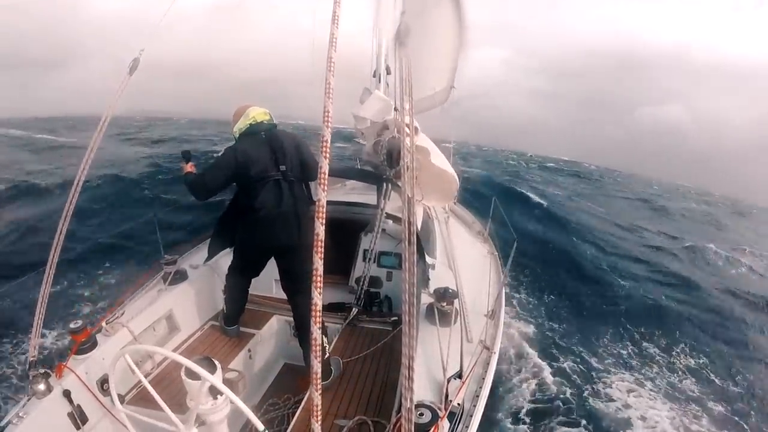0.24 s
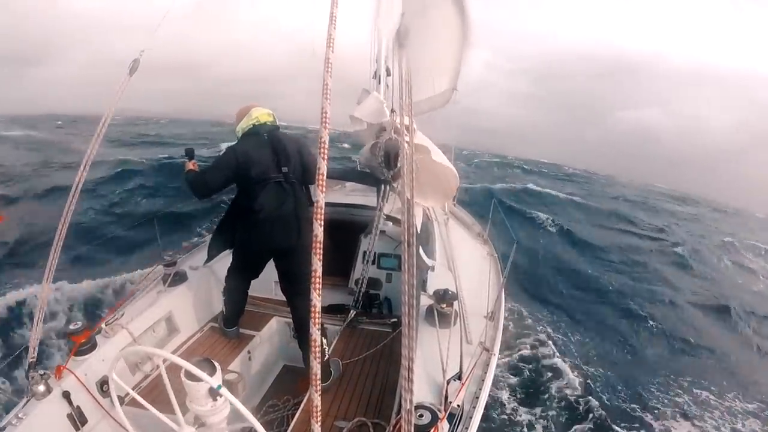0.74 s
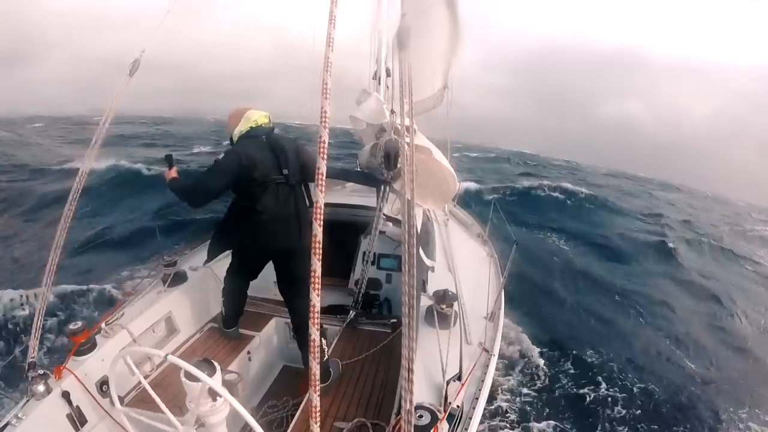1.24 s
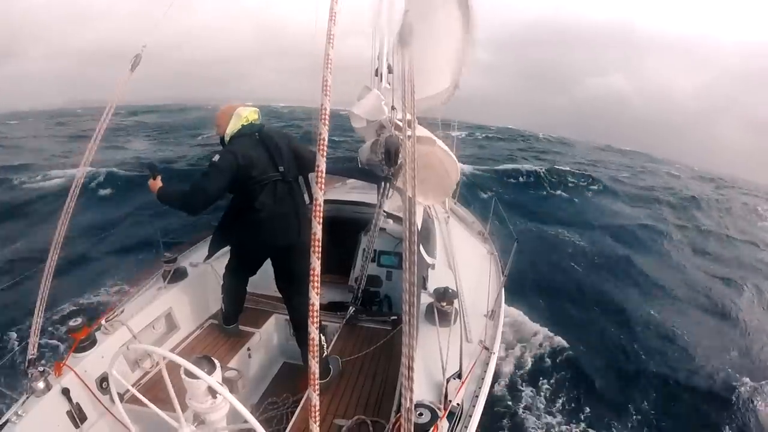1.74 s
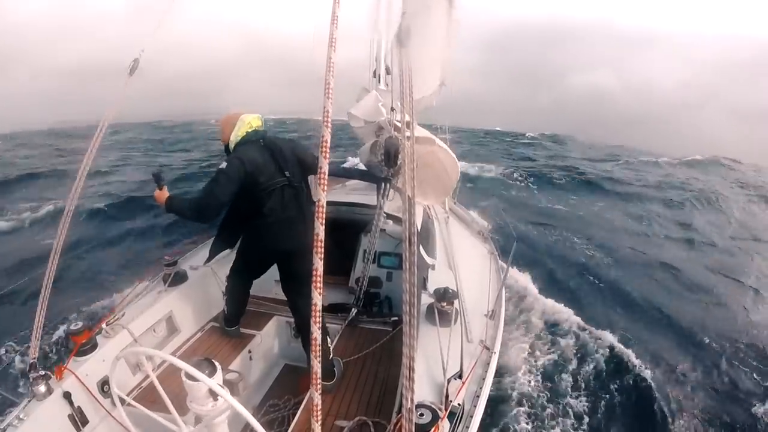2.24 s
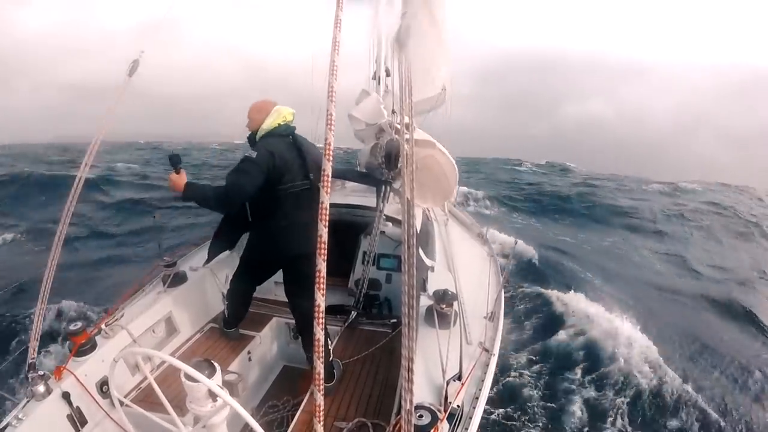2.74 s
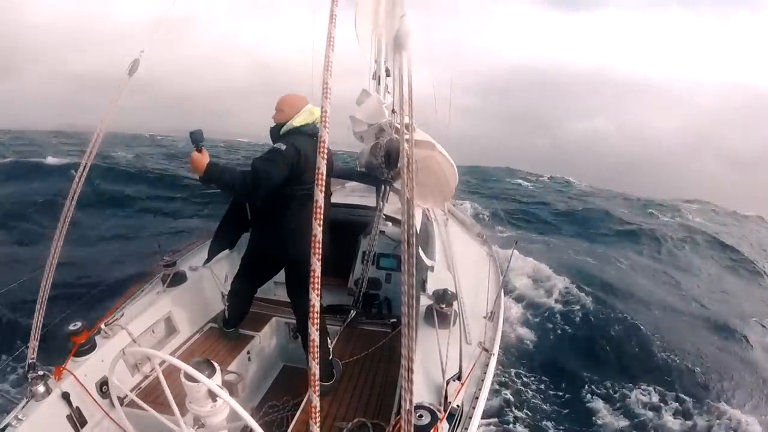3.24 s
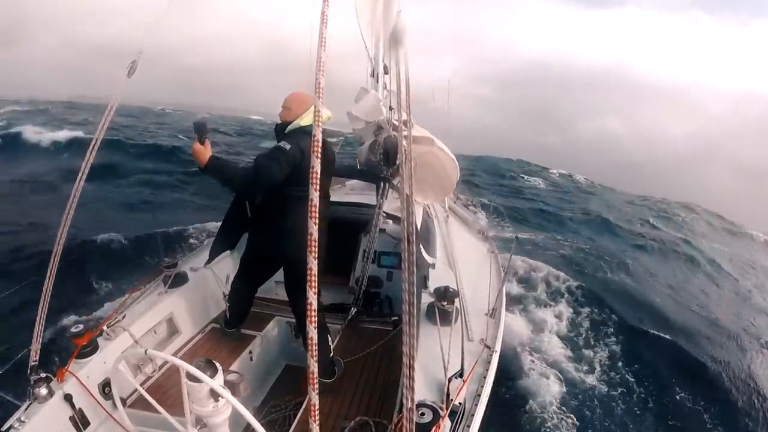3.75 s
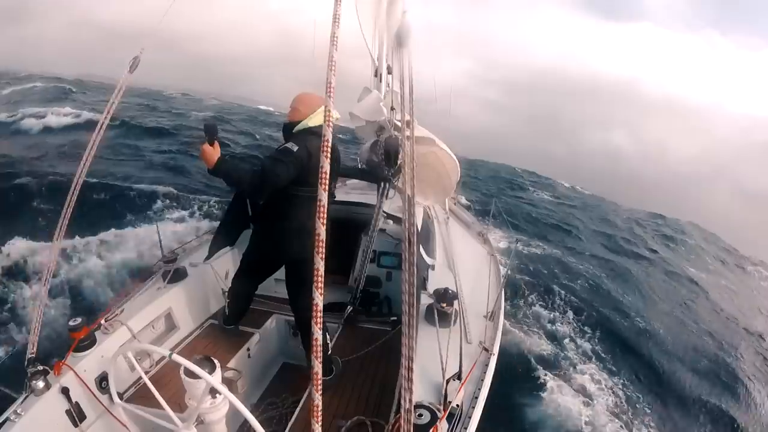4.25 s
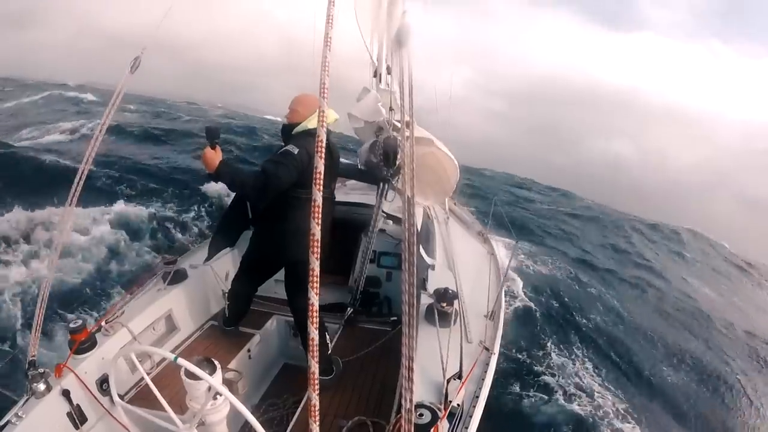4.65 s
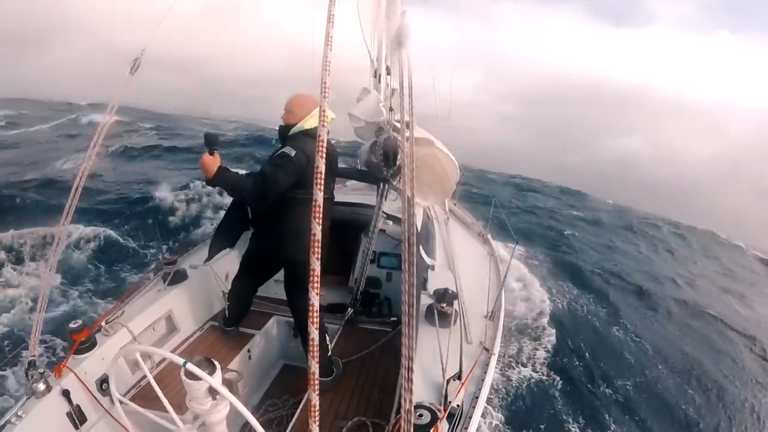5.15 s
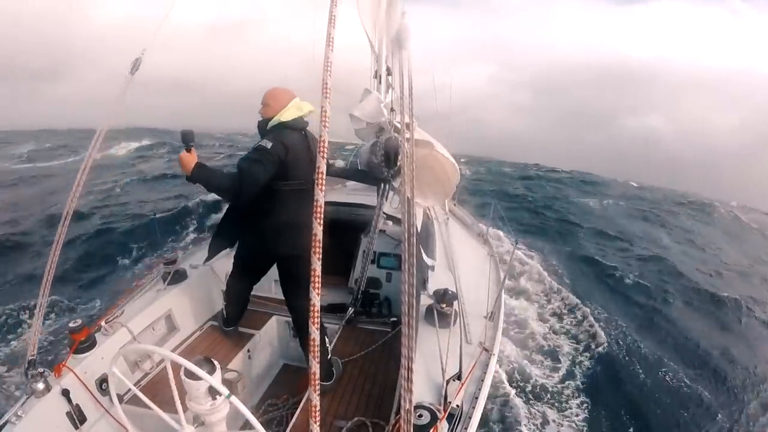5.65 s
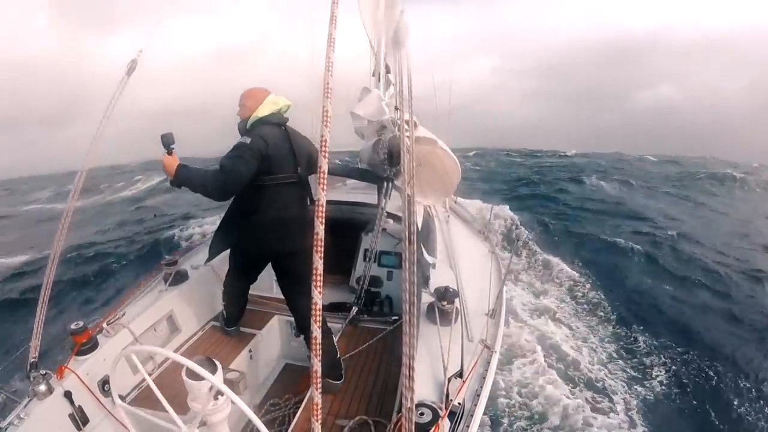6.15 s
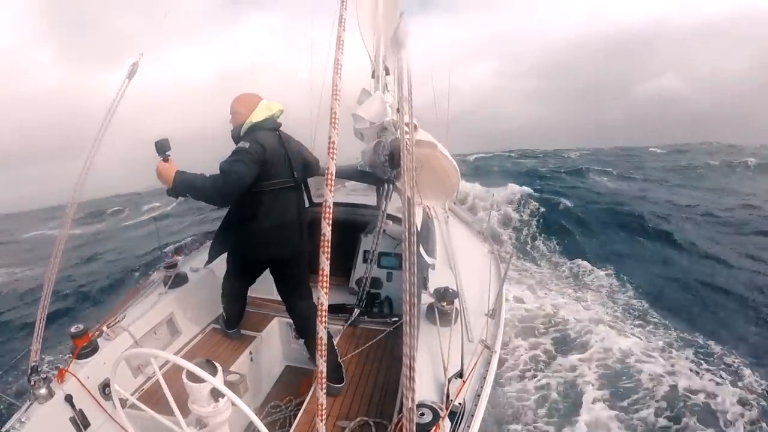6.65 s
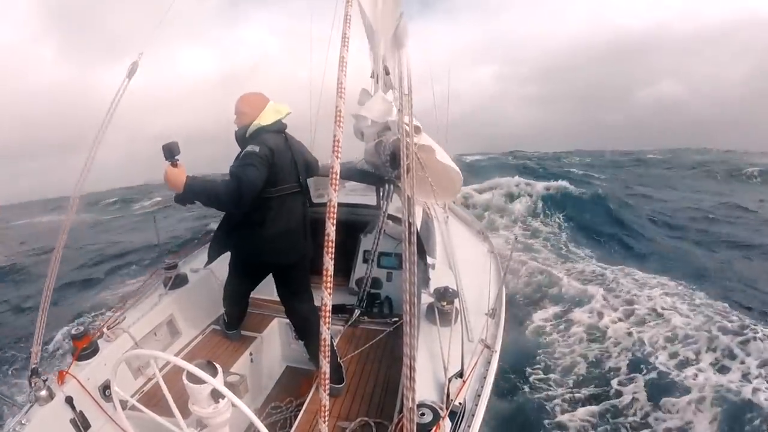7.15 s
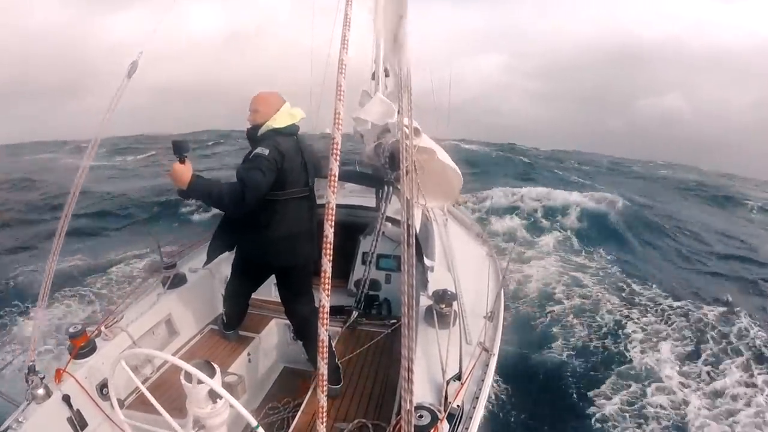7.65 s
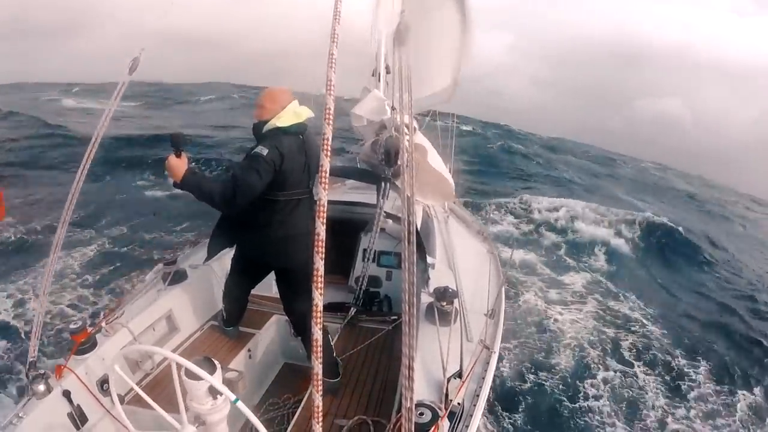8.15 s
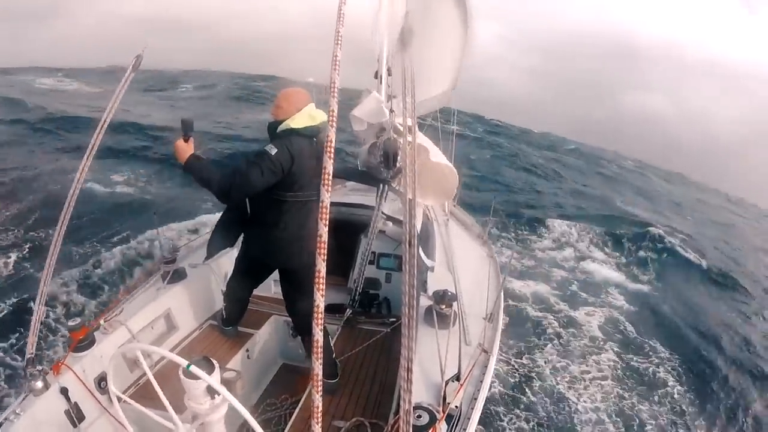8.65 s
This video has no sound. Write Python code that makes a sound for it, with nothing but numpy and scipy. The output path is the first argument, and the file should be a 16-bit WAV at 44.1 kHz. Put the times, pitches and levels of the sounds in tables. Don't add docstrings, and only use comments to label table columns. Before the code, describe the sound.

Overwhelming low wind buffeting rolls over an enclosed deck camera microphone in irregular thuds, with short lulls. Breaking crests swell and slacken beneath, muffled roar below and wet hiss above, with tiny bubbles in the wash. Shrouds hum softly in gusts. A spray swish leads into a booming slap at about 3.3 seconds; scattered pops and drops follow, then a sharp cluster of cracks and rattling hits around eight seconds. Outdoors, rough sea, no voice.

```python
import sys
import numpy as np
from scipy import signal
from scipy.fft import rfft, irfft, next_fast_len
from scipy.io import wavfile
from scipy.ndimage import uniform_filter1d, map_coordinates

SR = 44100
rng = np.random.default_rng(int(sys.argv[2]) if len(sys.argv) > 2 else 0)


def inscribe(sig):
    pcm = np.round(np.clip(np.atleast_2d(sig).T, -1, 1) * 32767)
    wavfile.write(sys.argv[1], SR, pcm.astype(np.int16))


def how_loud(loudness_db):
    steps = np.asarray(loudness_db, float) / 20
    return 10 ** steps


N = 393061

# [f/Hz, level/dB]
HEAVE_COLOUR = [(4, -31), (10, -3.5), (27, 0), (60, -4), (80, -9), (110, -19), (200, -61), (400, -120)]
FLUTTER_COLOUR = [(40, -34.5), (75, -2), (125, -3.5), (180, -11.5), (230, -26.5), (330, -51.5), (600, -120)]
RATTLE_COLOUR = [(120, -42), (200, 0), (280, -6), (330, -15.5), (500, -28.5), (900, -61), (1500, -120)]
# [t/s, strength level/dB, middle-eddy level/dB, small-eddy level/dB]
WIND = [(0, -11.5, -1, -2.5), (.6, -10.5, 1.5, -1), (1.3, -9.5, -1.5, -2.5), (2.1, -12.5, 1.5, 0.5),
        (2.8, -11, 2.5, 1.5), (3.5, -11, -1, 0), (4.2, -10.5, -1, 0.5), (4.9, -11.5, 0, 1),
        (5.6, -9.5, -3.5, -1.5), (6.3, -10.5, -2, -1.5), (7, -12, 1, 3), (7.7, -12, 3.5, 1),
        (8.3, -10.5, -0.5, 2), (8.91, -10, 0, -3.5)]
# [t/s, length/s, slow push level/dB, fast
# flutter level/dB]
EDDIES = [(0.22, 0.09, 4.5, 9), (0.63, 0.29, 0.5, 2), (0.85, 0.028, 6, 6), (1.16, 0.028, 10, -3),
          (1.48, 0.016, 4.5, 0.5), (2.19, 0.039, 1, 11.5), (2.33, 0.1, -2.5, 7), (2.51, 0.033, 5.5, -8),
          (3.08, 0.043, 6, 2), (3.31, 0.13, 4.5, 2.5), (3.4, 0.023, 5, 1), (4.19, 0.095, 6, -3),
          (4.72, 0.079, 4.5, 3.5), (5.31, 0.034, 5, 7), (5.8, 0.057, 3, 7.5), (6.1, 0.088, 3, 5),
          (6.26, 0.037, 6, 5), (6.47, 0.18, -2.5, 5.5), (6.74, 0.077, 6.5, 8.5), (7.12, 0.028, -6, 16),
          (7.18, 0.084, 4.5, 4.5), (7.27, 0.042, 3, 6.5), (7.59, 0.025, 10, 5.5), (7.67, 0.031, 12.5, -0.5),
          (7.85, 0.1, 9, 1.5), (8.21, 0.029, 9, 4), (8.41, 0.082, 1, 5), (8.59, 0.042, 9, 5),
          (0.024, 0.064, 0, 2), (0.69, 0.099, 1, 4), (.88, 0.054, 0.5, -4), (0.963, 0.036, 0, 2),
           (1.06, 0.038, 5.5, 4.5), (1.183, .07, 0, 0.5), (1.546, .05, -0.5, 1.5), (1.673, .07, 1, -8),
           (1.768, 0.078, 5.5, -5), (1.915, 0.063, 3, -1), (2.155, .05, 2, -6), (2.306, .05, 6, -1),
           (2.444, 0.038, 2.5, -2), (2.553, 0.036, -2, -0.5), (2.746, 0.051, 0, 0), (2.85, 0.039, -5, -0.5),
           (2.954, 0.04, -8, -6), (3.27, .05, 0, 4.5), (3.495, 0.059, 2.5, -5), (3.603, .06, 1, 2.5),
           (3.798, 0.062, 0.5, 5.5), (4.06, .08, -1, -2), (4.204, .05, -2, 1), (4.267, .05, -1, 3),
           (4.55, .05, -5, -5), (4.62, 0.079, 0, 1.5), (4.82, .07, -2.5, -1), (4.924, .07, 2.5, 3),
           (5.05, .06, -2, 3.5), (5.206, .05, 3, -3), (5.61, .05, 4, 0), (5.67, 0.072, -2.5, -6.5),
           (5.975, 0.048, 0.5, 3), (6.19, 0.069, 1, -4), (6.323, 0.055, -1, -0.5), (6.413, 0.036, 5.5, 0),
           (6.51, .05, -2, 2), (6.874, 0.049, 5.5, 0.5), (7.098, 0.044, -2, -3), (7.296, 0.041, 2.5, 4.5),
           (7.42, .08, -3.5, 0), (7.55, .08, -0.5, -2), (7.866, 0.071, -0.5, -4), (8.116, .07, 3, -2.5),
           (8.2, 0.037, -4, 3), (8.367, .07, -1, -5), (8.55, 0.082, -2, 2.5), (8.8, 0.059, -3.5, 1.5)]
# [t/s, length/s, depth/dB]
LULLS = [(.05, 0.11, 2.5), (.48, 0.055, 7), (1.39, 0.045, 8), (1.62, 0.041, 8), (1.86, 0.023, 7),
         (2.1, 0.076, 4.5), (2.25, 0.048, 9), (2.69, 0.12, 5), (2.91, 0.1, 1.5), (3.62, 0.21, 6),
         (3.87, .06, 7), (4.84, 0.062, 3.5), (5.04, 0.074, 6), (5.24, 0.089, 5.5), (5.53, 0.084, 9.5),
         (6.2, .04, 5.5), (6.37, 0.037, 9), (6.59, 0.037, 5.5), (7.45, 0.25, 2.5), (7.64, 0.024, 5.5),
         (7.74, 0.09, 10), (8.01, 0.044, 5.5), (8.54, .04, 6.5), (.92, 0.048, 3.5), (1.22, 0.042, 4.5),
         (4.07, .06, -0.5), (7.35, 0.065, 1), (.32, .04, 5), (7.5, .025, 8), (1.72, .04, 3), (3.7, .04, 4),
         (2.47, .03, 4)]
# [t/s, level/dB]
JOLTS = [(0.25, 8.5), (1.44, 2), (2.11, 9), (2.18, 8.5), (3.19, 8.5), (3.33, 13.5), (4.7, 1), (6.08, 8.5),
         (6.44, 3), (6.76, 7.5), (7.26, 2.5), (7.59, 10.5), (8.03, 13.5), (8.58, 2.5), (.95, 5),
         (1.28, 1.5), (1.55, 2), (1.66, -1), (1.8, 3), (2.75, -4), (3.45, 2), (4.87, -2), (5.2, -1.5),
         (5.4, 1), (5.65, 3), (5.84, -1), (6.9, -1), (7.14, -5), (7.36, -2), (8.15, -1)]
JOLT_S = 0.059
HEAVE_DB, FLUTTER_DB, RATTLE_DB = -2.5, -15, -29.5
RATTLE_FOLLOWS = 0.26
SHARED_CHOP_DB, HEAVE_CHOP_DB, CHOP_DB = 1.0, 1.5, 1.5

# [f/Hz, level/dB]
ROAR_COLOUR = [(210, -29), (350, -1), (443, -6.5), (526, -6), (805, -11), (886, -9.5), (1600, -13.5),
               (2080, -38.5), (3520, -120)]
WASH_COLOUR = [(880, -40), (1500, -18), (1590, -15), (1790, -1), (2390, 0.5), (2980, -1.5), (3350, -7),
               (3810, -4.5), (4240, -13.5), (4500, -14.5), (5850, -40), (9900, -120)]
SPRAY_COLOUR = [(2470, -34), (4200, -3.5), (4730, 0), (5160, -6.5), (5830, -4.5), (6510, -11), (7020, -6),
                (7900, -15.5), (9430, -14.5), (11500, -22.5), (15000, -52), (22000, -120)]
MIST_COLOUR = [(6000, -39.5), (8500, -4), (11500, -6.5), (15300, -6.5), (17000, -58)]
# [t/s, wash level/dB]
FLOW = [(0.0, -49.5), (0.81, -48), (1.62, -44.5), (2.43, -46), (3.24, -46), (4.05, -49), (4.86, -49.5),
        (5.67, -52.5), (6.48, -48.0), (7.29, -47.5), (8.1, -48), (8.91, -48.5)]
# [t/s, length/s, swell level/dB, extra spray level/dB]
CRESTS = [(.235, 0.067, 7, 1), (.8, 0.22, 2.5, 1.5), (1.35, 0.13, 2, -0.5), (1.93, .25, 2.5, -2),
          (2.13, 0.087, 4.5, -1.5), (2.2, 0.047, 6.5, 2), (2.41, 0.027, 1, -3), (2.46, 0.021, 5, -3),
          (2.58, 0.077, 2, 2.5), (3.07, 0.061, 3.5, -1.5), (3.14, 0.21, 1, 5), (3.23, 0.065, 1.5, -0.5),
          (3.74, 0.11, 0, 2.5), (4.11, 0.034, 4.5, -4), (4.26, 0.042, 3.5, -2.5), (4.37, 0.026, 1.5, -2),
          (4.51, .07, 2.5, 1.5), (4.52, 0.34, 5, -2), (4.65, 0.036, 2.5, -1), (5.79, 0.063, 2.5, -3.5),
          (6.09, 0.05, 3.5, 1.5), (6.43, 0.091, 3, -1), (6.75, .14, 3, 1), (7.16, .12, 3, 0.5),
          (8.03, 0.035, 3, 4), (8.44, 0.2, 3.5, -1.5), (8.81, 0.046, 4, -2), (.58, .15, 1, -1)]
# [t/s, length/s, depth/dB]
TROUGHS = [(.39, .12, 4), (1.16, 0.11, 1.5), (1.72, 0.39, 2.5), (2.36, .07, 2.5), (2.75, 0.097, 2.5),
           (3.61, 0.13, 0.5), (3.96, 0.19, 3), (5.12, 0.24, 1), (5.68, 0.079, 1.5), (7.4, .12, 2.5),
           (7.73, 0.28, 3.5), (8.7, .2, -0.5)]
# [t/s, length/s, swell level/dB]
BREAKERS = [
    (.95, .4, 1.5),
    (3.17, 0.25, 6),
    (5.4, 0.37, 1),
    (6.9, .4, 1),
    (7.5, 0.74, 1),
    (8.08, 0.23, 5),
]
# [t/s, f/Hz]
GURGLE = [(0.0, 2460), (0.99, 2430), (1.68, 2540), (1.78, 2323), (3.22, 2602), (3.44, 2422), (6.0, 2350),
          (6.22, 2622), (7.71, 2260), (8.06, 2576), (8.18, 2216), (8.23, 2500), (8.38, 2296), (8.9, 2487)]
ROAR_DB, WASH_DB, SPRAY_DB, BUBBLE_DB = -4, -3, -11, -9.5
ROAR_FOLLOWS, SPRAY_FOLLOWS = 0.35, 0.88
MIST_FOLLOWS = 0.5
RISE_SHARE = 0.96
SPLATS_PER_S, SPLAT_S, SPLAT_DB = 60, 0.011, 0.95
SPLIT_HZ, UPPER_FOLLOWS = 2500, 0.96
BUBBLES_PER_S, BUBBLE_S = 45, 0.022
BUBBLE_RISE, BUBBLE_SPREAD = 0.2, 0.1

# [t/s, length/s, swell level/dB]
LOW_SINGS = [
    (2.36, 0.076, 14.5),
    (3.5, 0.68, 9.5),
    (5.3, 0.3, 10.5),
    (6.6, 0.42, 6.5),
    (7.02, 0.14, 17),
    (7.4, 0.36, 6),
    (7.72, .1, 12.5),
    (8.1, 0.33, 14.5),
]
HIGH_SINGS = [
    (1.41, .25, 6),
    (2.1, .35, 4.9),
    (3.14, .15, 17),
    (3.65, .3, 10.4),
    (5.3, .3, 4),
    (6.6, .2, 6),
    (7.02, .15, 6),
    (8.03, 0.14, 12),
]
LOW_REST_DB, HIGH_REST_DB = -66.5, -66
# [t/s, f/Hz, level/dB]
CREAK = [
    (5.21, 1750, -72),
    (5.223, 1750, -52),
    (5.288, 1780, -55),
    (5.3, 2300, -58),
    (5.315, 3000, -55),
    (5.33, 3200, -72),
]

# [t/s, rms level/dB, rise/s, fall by 60 dB/s, brightness level/dB]
SLAPS = [(3.313, -35.5, 0.027, 0.12, -11), (8.007, -35.5, 0.0033, 0.048, -2.5),
         (8.014, -33.5, 0.0073, 0.098, -4), (8.03, -40, .003, 0.067, 4), (8.7, -46, .006, .08, 0),
         (8.078, -46, .008, 0.08, 4), (8.1715, -50, .0008, .03, 14), (8.001, -39, .004, .08, -4),
         (8.042, -38, .006, .1, -4), (2.5, -56, .03, .12, -1), (0.23, -54, 0.033, 0.15, 5.5)]
# [f/Hz, level/dB]
SLAP_BODY = [(210, -27), (350, -7), (421, 2), (517, -12), (878, -3), (1310, -9.5), (1470, -12), (1700, -33),
             (2210, -55.5), (3740, -120)]
SLAP_CRACK = [(1000, -43), (1700, -10), (2790, -9), (3080, -2), (4370, -11), (4720, -21), (5940, -11.5),
              (6640, -21.5), (10700, -30), (13000, -36)]
# [t/s, centre f/Hz, level/dB]
SWISH = [
    (3.05, 5400, -72),
    (3.075, 5800, -54),
    (3.14, 6200, -53),
    (3.165, 7600, -57),
    (3.185, 9800, -63),
    (3.205, 11400, -80),
]
# [t/s, peak level/dB, width/ms]
POPS = [
    (3.313, -29, .3),
    (3.331, -19.5, 0.27),
    (6.1228, -24, 0.15),
    (7.275, -27, 0.22),
    (0.277, -32, .3),
    (6.251, -38, .3),
    (6.966, -45, .3),
]
# [t/s, peak level/dB, case ring level/dB]
DROPS = [(2.1024, -47, 7), (2.464, -51, 1), (3.0779, -46, 4), (4.721, -44, 1), (4.7544, -56, 5),
         (4.9591, -50.5, 4), (5.152, -46, -5), (5.158, -40.5, -12), (6.001, -49, -12), (6.9166, -40, -8),
         (7.1157, -38, -6), (8.012, -48, 5), (8.1712, -47, 2)]
# [f/Hz, level/dB]
DROP_COLOUR = [(1500, -37), (4300, -1), (7000, -1), (11500, -2), (15500, -10.5), (20000, -43)]
# [t/s, f/Hz, peak level/dB, fall by 60 dB/s]
BOOMS = [
    (3.309, 455, -26.5, 0.16),
    (3.312, 296, -28, 0.16),
    (8.015, 348, -37, 0.18),
]
# [t/s, f/Hz, peak level/dB, fall by 60 dB/s]
RINGS = [(3.307, 1150, -39, .05), (8.001, 1110, -38, .05), (8.0105, 5780, -46, .015),
         (8.012, 851, -32, .08), (8.008, 1450, -38, .06), (8.018, 600, -36, .07), (8.022, 3140, -42, .05),
         (8.027, 3900, -45, .02), (8.04, 6800, -50, .012), (8.05, 5780, -50, .012), (8.052, 3140, -46, .03),
         (8.072, 1300, -42, .03), (8.073, 900, -41, .04), (8.08, 3600, -43, .015), (8.084, 4400, -48, .01),
         (8.1708, 3450, -37, .018), (8.1712, 2700, -41, .012), (8.1735, 1900, -36, .025),
         (8.172, 950, -42, .02)]
RING_ROUGH_DB = 2.5

# [t/s, length/s, highest f kept/Hz]
SHORTFALLS = [(.17, .05, 11200), (.43, .025, 11000), (.51, .04, 11300), (.74, .05, 12800),
              (1.18, .03, 11100), (1.36, .05, 13600), (1.47, .03, 11000), (1.6, .05, 13400),
              (1.7, .025, 13000), (1.83, .055, 12000), (1.94, .085, 12100), (2.18, .075, 11500),
              (2.43, .07, 11100), (2.56, .04, 11100), (2.64, .04, 11900), (3.2, .03, 11100),
              (3.42, .05, 11100), (3.52, .04, 13500), (3.64, .04, 13200), (4.23, .03, 11400),
              (4.42, .07, 12500), (4.76, .13, 11300), (4.93, .075, 12800), (5.27, .05, 11300),
              (5.49, .04, 14400), (5.65, .04, 12400), (5.77, .025, 11200), (5.94, .045, 11200),
              (6.17, .055, 11300), (6.36, .03, 12900), (6.46, .045, 12600), (6.55, .055, 11300),
              (6.73, .05, 12800), (6.83, .035, 11200), (7.02, .03, 11200), (7.08, .025, 12900),
              (7.14, .07, 12000), (7.3, .04, 11300), (7.41, .05, 12000), (7.73, .05, 12600),
              (7.93, .1, 12800), (8.13, .035, 11300), (8.21, .035, 11300), (8.75, .13, 11900)]
TOP = 0.97


def unit(x):
    return x / np.sqrt(np.mean(x ** 2) + 1e-20)


def curves(rows):
    s, *columns = np.transpose(rows)
    return [np.interp(np.arange(N) / SR, s, column) for column in columns]


def swells(rows, rise=1):
    s, length, *dbs = np.transpose(rows)
    t = np.arange(0, N + 128, 128) / SR
    late = t[:, None] - s
    flank = length * np.where(late < 0, rise, 2 - rise)
    bells = np.exp(-4 * np.log(2) * (late / flank) ** 2)
    return [np.interp(np.arange(N) / SR, t, bells @ db) for db in dbs]


def wobble(rate):
    knots = rng.standard_normal(int(N * rate / SR) + 4)
    return map_coordinates(knots, [np.arange(N) * rate / SR])


def coloured(x, spectrum):
    m = next_fast_len(len(x) + 8192)
    hz, db = np.transpose(spectrum)
    log_hz = np.log(np.fft.rfftfreq(m, 1 / SR) + 1)
    gain = how_loud(np.interp(log_hz, np.log(hz + 1), db))
    return unit(irfft(rfft(x, m) * gain, m)[:len(x)])


def steadied(x, span, share):
    power = np.abs(signal.hilbert(x, next_fast_len(N))[:N]) ** 2
    width = int(span * SR)
    swell = np.abs(uniform_filter1d(uniform_filter1d(power, width), width)) + 1e-3
    return unit(x * swell ** (-np.clip(share, 0, 1) / 2))


def buffet():
    wind_db, churn_db, small_db = curves(WIND)
    push_db, fast_db = swells(EDDIES)
    lull_db, = swells(LULLS)
    jolt_db, = swells([(s, JOLT_S, db) for s, db in JOLTS])
    wind_db = wind_db + SHARED_CHOP_DB * wobble(14)

    heave_db = wind_db + HEAVE_DB + push_db - lull_db + HEAVE_CHOP_DB * wobble(16)
    flutter_db = wind_db + FLUTTER_DB + churn_db + fast_db - lull_db + CHOP_DB * wobble(18)
    rattle_db = wind_db + RATTLE_DB + RATTLE_FOLLOWS * (fast_db - lull_db)
    rattle_db = rattle_db + small_db + jolt_db + CHOP_DB * wobble(18)

    lumps = wobble(30)
    heave = coloured(rng.standard_normal(N), HEAVE_COLOUR)
    flutter = coloured(how_loud(2.85 * lumps) * rng.standard_normal(N), FLUTTER_COLOUR)
    rattle = coloured(how_loud(2.1 * lumps) * rng.standard_normal(N), RATTLE_COLOUR)
    heave = steadied(heave, 0.066, 0.68)
    flutter = steadied(flutter, 0.047, 0.69)
    rattle = steadied(rattle, 0.032, 0.57)
    return how_loud(heave_db) * heave + how_loud(flutter_db) * flutter + how_loud(rattle_db) * rattle


def patchy(spectrum, patchy_db, grains_per_s, grain_db):
    z = signal.stft(rng.standard_normal(N), nperseg=512)[2]
    field = uniform_filter1d(rng.standard_normal(z.shape), size=8, axis=0)
    field = uniform_filter1d(field, size=8, axis=1)
    bed = signal.istft(z * how_loud(patchy_db * unit(field)), nperseg=512)[1][:N]
    chance, side, strength = rng.random((3, N))
    spikes = (chance < grains_per_s / SR) * np.sign(side - 0.5) * how_loud(10 * strength)
    return coloured(unit(bed) + how_loud(grain_db) * unit(spikes), spectrum)


def tilted(x, tilt_db):
    low = signal.sosfiltfilt(signal.butter(2, SPLIT_HZ, fs=SR, output="sos"), x)
    return how_loud(-tilt_db / 2) * low + how_loud(tilt_db / 2) * (x - low)


def splats():
    chance, size = rng.random((2, N))
    jumps = (chance < SPLATS_PER_S / SR) * -np.log(size + 1e-9)
    fading = signal.lfilter([1], [1, -np.exp(-1 / (SPLAT_S * SR))], jumps)
    return unit(uniform_filter1d(fading - fading.mean(), size=90))


def bubbles():
    draw = rng.random((400, 3))[:int(BUBBLES_PER_S * N / SR)]
    start = (draw[:, :1] * N).astype(int)
    life = np.linspace(0, 1, int(BUBBLE_S * SR))
    hz = curves(GURGLE)[0][start] * np.exp(BUBBLE_SPREAD * 4 * (draw[:, 1:2] - 0.5))
    phase = 2 * np.pi * hz * BUBBLE_S * (life + BUBBLE_RISE * (life * life - life) / 2)
    chirps = how_loud(12 * draw[:, 2:]) * np.sin(np.pi * life) * np.sin(phase)
    places = start + np.arange(len(life))
    return unit(np.bincount(places.ravel(), chirps.ravel(), N)[:N])


def sea():
    flow_db, = curves(FLOW)
    crest_db, extra_db = swells(CRESTS, RISE_SHARE)
    trough_db, = swells(TROUGHS)
    breaker_db, = swells(BREAKERS)
    mean_db = flow_db.mean()
    swing_db = flow_db - mean_db + crest_db - trough_db
    shimmer = 0.43 * wobble(16) + 0.6 * wobble(55) + SPLAT_DB * splats()

    roar_db = mean_db + ROAR_DB + ROAR_FOLLOWS * swing_db + breaker_db
    wash_db = mean_db + WASH_DB + swing_db
    spray_db = mean_db + SPRAY_DB + SPRAY_FOLLOWS * swing_db + extra_db
    mist_db = -76.5 + MIST_FOLLOWS * (flow_db - mean_db) + 1.2 * wobble(6.8)

    roar = patchy(ROAR_COLOUR, 0.92, 300, -8.5)
    wash = tilted(patchy(WASH_COLOUR, 1.6, 550, -9.0), UPPER_FOLLOWS * extra_db)
    spray = patchy(SPRAY_COLOUR, 1.0, 1000, -7)
    mist = patchy(MIST_COLOUR, 1.5, 900, -9.0)

    roar = how_loud(roar_db + 0.28 * shimmer + 0.89 * wobble(35)) * roar
    wash = how_loud(wash_db + 0.87 * shimmer + 0.59 * wobble(40)) * wash
    spray = how_loud(spray_db + 0.98 * shimmer + 0.44 * wobble(40)) * spray
    return roar + wash + spray + how_loud(mist_db) * mist + how_loud(wash_db + BUBBLE_DB) * bubbles()


def narrow(hz, width_hz):
    turn = 2 * np.pi * np.cumsum(hz * np.ones(N)) / SR
    return unit(wobble(width_hz) * np.cos(turn) + wobble(width_hz) * np.sin(turn))


def rigging():
    low_db, = swells(LOW_SINGS)
    high_db, = swells(HIGH_SINGS)
    creak_hz, creak_db = curves(CREAK)
    low_hum = how_loud(LOW_REST_DB + low_db) * narrow(641, 75)
    high_hum = how_loud(HIGH_REST_DB + high_db) * narrow(870, 70)
    creak = steadied(narrow(creak_hz, 150), 0.004, 0.54)
    return low_hum + high_hum + how_loud(creak_db) * creak


def slaps():
    before, after = SR // 10, SR // 2
    t = np.arange(-before, after) / SR
    body = coloured(rng.standard_normal(N + SR), SLAP_BODY)
    crack = coloured(rng.standard_normal(N + SR), SLAP_CRACK)
    crack = np.pad(how_loud(3.8 * wobble(150)), (0, SR)) * crack
    out = np.zeros(N + SR)
    for s, db, rise, t60, bright_db in SLAPS:
        hit = round(s * SR)
        span = slice(hit - before, hit + after)
        shape = how_loud(db + np.where(t < 0, 20 * t / rise, -60 * t / t60))
        out[span] += shape * (body[span] + how_loud(bright_db - 8.5) * crack[span])
    swish_hz, swish_db = curves(SWISH)
    return out[:N] + how_loud(swish_db) * narrow(swish_hz, 1500)


def ticks():
    out = np.zeros(N + SR)
    t = np.arange(-400, 800) / SR
    after = np.maximum(t, 0)
    for s, db, ms in POPS:
        step = np.tanh(t / ms * 1000)
        leak = how_loud(-60 * np.abs(t) / 0.025)
        out[round(s * SR) - 400:][:len(t)] -= how_loud(db) * step * leak
    for s, db, ring_db in DROPS:
        click = coloured(rng.standard_normal(len(t)), DROP_COLOUR) * how_loud(-60 * after / 0.0023)
        ring = how_loud(ring_db + 3.0 - 60 * after / 0.006) * np.sin(2 * np.pi * 3600 * after)
        out[round(s * SR) - 400:][:len(t)] += how_loud(db) * (t >= 0) * (click + ring)
    return out[:N]


def hull():
    t = np.arange(SR // 2) / SR
    out = np.zeros(N + SR)
    for s, hz, db, t60 in BOOMS + RINGS:
        rough = np.interp(t * hz / 4, np.arange(2000), rng.standard_normal(size=2000))
        fall = how_loud(db + RING_ROUGH_DB * rough - 60 * t / t60)
        onset = 1 - np.exp(-t * hz)
        out[round(s * SR):][:len(t)] += fall * onset * np.sin(2 * np.pi * hz * t)
    return out[:N]


def scene():
    return (buffet() + sea() + rigging() + slaps() + ticks() + hull())[None]


def thinned(x, hole_db, from_hz, tops_hz, open_share):
    hz, t, z = signal.stft(x, SR, nperseg=512)
    hz = hz[:, None]
    size = uniform_filter1d(np.abs(z), size=3, axis=-2)
    mean = uniform_filter1d(uniform_filter1d(size, size=12, axis=-2), size=12, axis=-1)
    strictness = np.repeat(rng.standard_normal(len(t) // 4 + 1), 4)[:len(t)]
    spare = np.repeat(rng.random(len(t) // 10 + 1), 10)[:len(t)]
    bar_db = hole_db + 2.1 * strictness + 5 * np.log2(hz / from_hz + 1e-3)
    weak = (size < mean * how_loud(bar_db)) & (hz > from_hz)
    top_hz = np.where(spare < open_share, tops_hz[1], tops_hz[0])
    for s, length, kept_hz in SHORTFALLS:
        top_hz[(t > s) & (t < s + length)] = kept_hz
    return signal.istft(z * ~weak * (hz < top_hz), SR, nperseg=512)[1][..., :N]


def top_cut(x):
    return signal.sosfilt(signal.butter(12, 15820, fs=SR, output="sos"), x)


def record(dry):
    soft = dry / (1 + np.abs(dry / TOP) ** 4) ** (1 / 4)
    mix = thinned(soft, hole_db=-4.0, from_hz=7600, tops_hz=[15100, 15800], open_share=0.5)
    return top_cut(mix)


dry = scene()
out = record(dry)
inscribe(out)
```